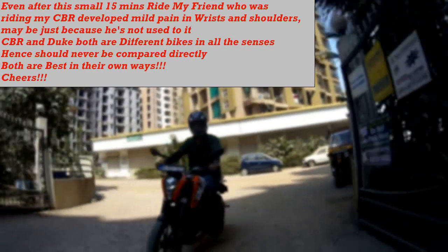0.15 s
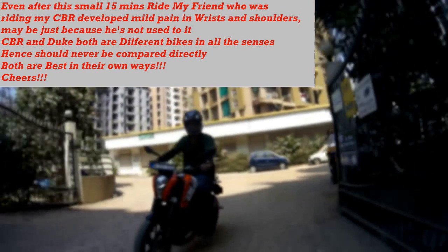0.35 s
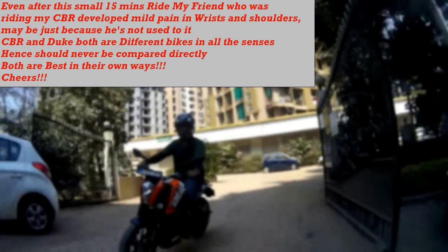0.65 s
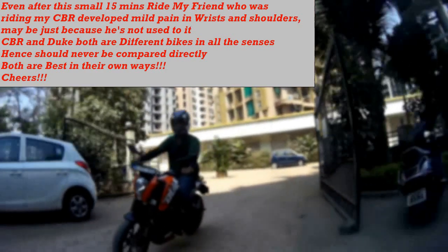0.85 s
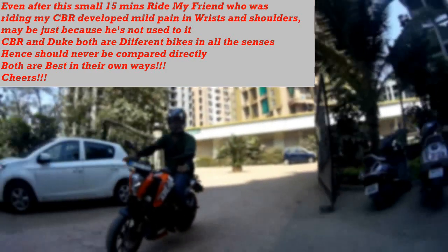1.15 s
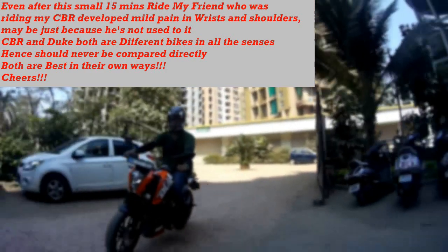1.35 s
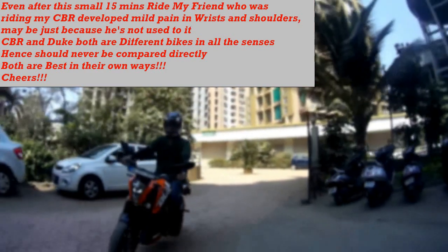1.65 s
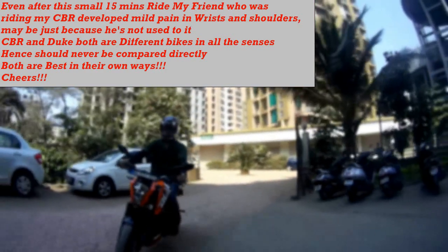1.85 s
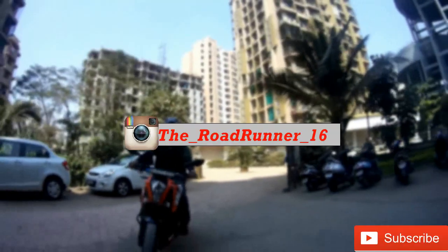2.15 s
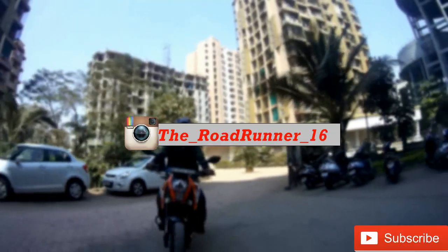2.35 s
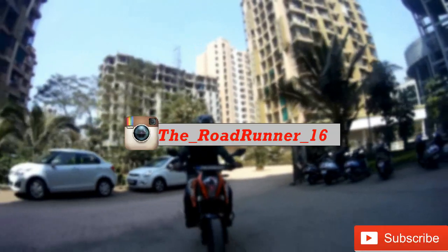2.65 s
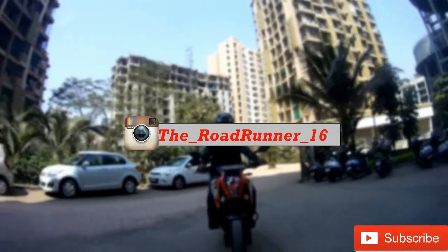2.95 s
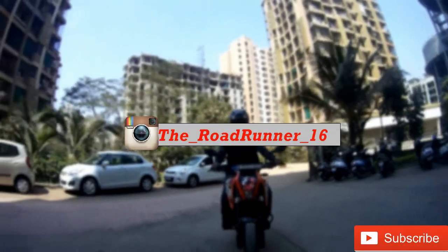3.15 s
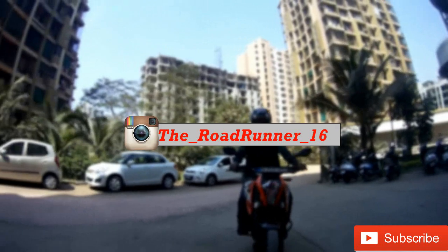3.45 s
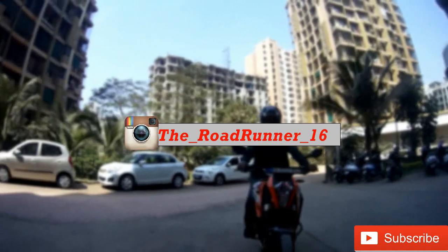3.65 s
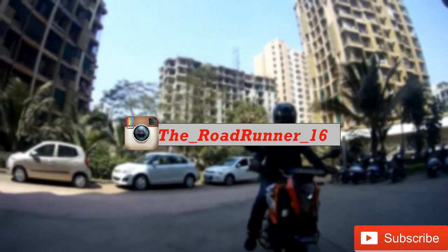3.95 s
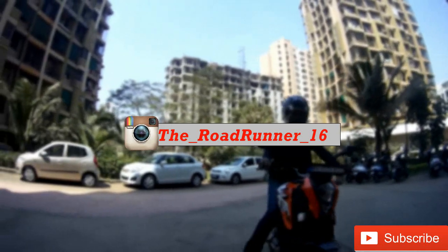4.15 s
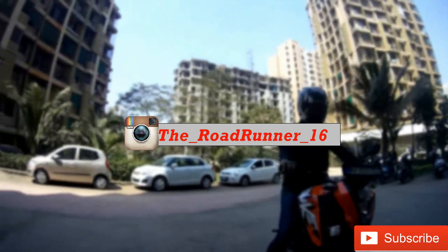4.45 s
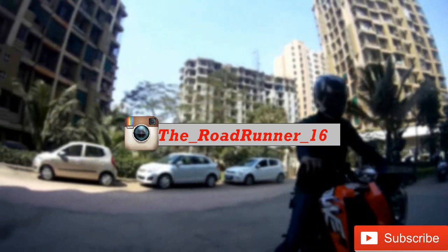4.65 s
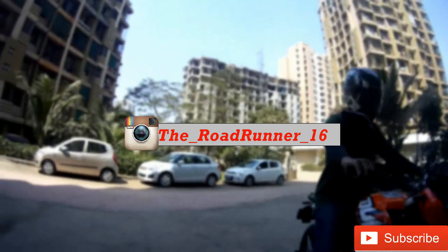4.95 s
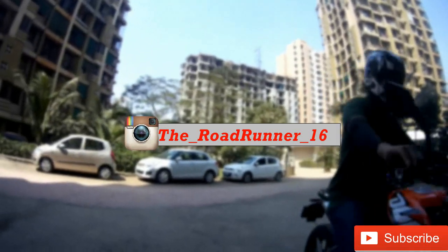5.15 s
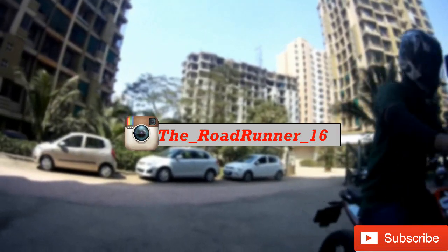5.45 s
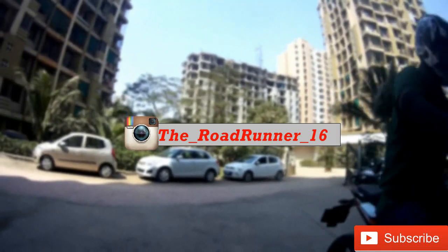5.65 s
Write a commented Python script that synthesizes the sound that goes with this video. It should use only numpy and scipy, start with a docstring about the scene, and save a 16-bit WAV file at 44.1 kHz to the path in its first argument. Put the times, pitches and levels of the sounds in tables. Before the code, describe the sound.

In a quiet lane, a motorcycle approaches with a gentle, throaty pull of its single-cylinder engine. The revs soon fall, a few faint ticks come from the chassis, and the engine settles into a steady putter close by, with valves clattering in step with the exhaust beats. The moving microphone picks up a low rumble that fades about halfway through, while the idle carries on to the end.

```python
"""Motorcycle pulling up in a lane

A single-cylinder four-stroke rolls up on a little throttle, shuts off and idles a few steps from the
microphone. Each firing sends a puff through the silencer and a sharp bark that bounces about the lane;
valve gear and casings clatter in step. The chassis ticks now and then, and a low rumble shakes the
microphone while it is on the move."""
import sys
import numpy as np
from scipy import signal
from scipy.io import wavfile
from scipy.ndimage import uniform_filter1d

SR = 44100
rng = np.random.default_rng(int(sys.argv[2]) if len(sys.argv) > 2 else 0)


def transcribe(u):
    """Save the signal u as a 16-bit wav file named by the first command-line argument.

    u: samples, shape (n,) or (channels, n), limited to [-1, 1]; the rate is SR.
    q: integer samples, one column per channel.
    """
    v = np.clip(np.atleast_2d(u).T, -1, 1)
    q = np.round(v * 32767).astype(np.int16)
    wavfile.write(sys.argv[1], SR, q)


N = 255339
TIME = np.arange(N) / SR
RUN_IN = SR // 4   # samples: the engine is already turning at time zero

# air of the lane, the bass band first: (frequency [Hz], width [Hz], relative level [dB])
AIR_BANDS = [(47, 23, 40), (1500, 4300, 8), (4360, 3000, 2), (8250, 4500, 2), (12500, 4600, 1.5)]
# shaking of the microphone: (frequency [Hz], width [Hz], relative level [dB])
SHAKE_BANDS = [(31.8, 44, 1.0), (53.0, 6.6, -4.0), (115.5, 80, 1.7)]
# swells of the microphone rumble: (time [s], length [s], lift [dB])
RUMBLE_SWELLS = [(0.597, 0.39, 4), (1.166, 0.34, 10.5), (1.787, .5, 7), (2.7, 0.36, 5.0),
                 (3.277, 0.28, 1.5)]
# ticks of loose chassis parts: (time [s], level [dB], frequency [Hz])
CHASSIS_TICKS = [(1.109, -58, 4700), (1.189, -61, 4070), (1.359, -60.5, 4300), (1.552, -55, 4600),
                 (1.882, -41.5, 2370), (1.883, -67, 5500)]
# a gentle pull, the run-down, then an idle that stumbles once or twice: (time [s], firing rate [Hz])
FIRING_RATE = [(0.0, 26.057), (0.71, 28.719), (0.96, 24.458), (1.34, 15.835), (1.4, 13.179), (1.65, 12.033),
               (2.8, 11.557), (3.12, 11.351), (3.25, 12.223), (3.59, 11.002), (3.74, 12.034),
               (3.93, 11.581), (4.84, 11.455), (5.1, 11.718), (5.79, 11.586)]
# the rider's throttle: (time [s], opening [0-1])
THROTTLE_OPENING = [(0, .75), (.3, .95), (.6, 1.0), (.78, .8), (.95, .45), (1.15, .2), (1.5, .04),
                    (2.2, 0.0), (5.79, 0.0)]
# blows of metal on metal: (place in cycle [0-1], decay [cycles], in the case [dB], in the covers [dB])
ENGINE_CONTACTS = [(.925, 0.042, 9.5, 11), (0.2, 0.07, -1.5, 4), (0.2, 0.041, 3, -7), (.42, 0.036, 8, 6.5),
                   (0.5, 0.2, -3, -8.5)]
# frame and crankcase resonances: (frequency [Hz], width [Hz], relative level [dB])
CASE_MODES = [(109, 50, -7), (132.2, 21, -13), (212.2, 53.6, -2), (240.5, 26, 3), (304.1, 41, -2.5),
              (410.6, 33.6, 5), (474.9, 42, 2.5), (532.4, 42.7, -2)]
# cylinder head and cover resonances: (frequency [Hz], width [Hz], relative level [dB])
COVER_MODES = [(627, 57, -2), (713.4, 51, -0.5), (824.5, 120, -5.5), (959, 82, -3.5), (1057.3, 120, 2),
               (1286.7, 137, 1), (1589, 120, -13.5), (1827, 220, -19), (2002, 111, -13.5), (2225, 160, -16),
               (2512, 310, -29), (2895, 110, -29.5), (3300, 360, -45.5), (4363, 100, -41)]
# resonances of the valve clack: (frequency [Hz], width [Hz], relative level [dB])
CLACK_MODES = [(1675, 100, -10), (2003, 360, 2.5), (2860, 200, -19.5), (4540, 1800, -29.5)]
# piston knocks under load, one at each end of every stroke: (place in cycle [0-1], level at throttle 1 [dB])
STROKE_KNOCKS = [(0.041, -58.5), (0.281, -63.5), (.55, -55), (0.774, -55.5)]
# hiss of gas leaving the pipe: (frequency [Hz], width [Hz], relative level [dB])
JET_BANDS = [(1776, 820, 21), (2878, 82, 10.5), (3660, 1200, -2.5), (4330, 330, 0.5), (4930, 1000, -5.5),
             (7000, 2300, -14), (10400, 6500, -20.5)]
# silencer resonances with the throttle shut: (frequency [Hz], width [Hz], relative level [dB])
SILENCER_MODES = [(97.2, 6.9, 2), (124, 15, -18), (140, 15, -11.5), (220, 19, -16), (228.2, 8, -9.5),
                  (246.6, 14.6, 5), (299.3, 8.3, -19)]
# pipe resonances that boom under load: (frequency [Hz], width [Hz], relative level [dB])
BOOM_MODES = [(108.7, 27.7, 1.5), (191.6, 25, -0.5), (217.4, 9.5, 1), (241, 15, 4), (295, 24, -10),
              (399.2, 18, -4), (491.8, 22, -2.5), (715.6, 36, -5.5)]
# resonances of the bark: (frequency [Hz], width [Hz], relative level [dB])
BARK_MODES = [(422.6, 47, 14), (460, 73, -6.5), (990, 71, -5.5)]
# the bark returning from pipe ends, ground and parked cars: (delay [s], gain [signed ratio])
BARK_ECHOES = [(.0138, -.5), (.0225, -.3), (.0385, -.25)]
# exhaust at the microphone as the bike rolls up and turns: (time [s], thump trim [dB], bark trim [dB])
MIC_EXPOSURE = [(.15, 0.4, -2.5), (.6, 0, 1.5), (1.5, 0, 1.1), (2.15, -1, 2), (3.3, 0, 0.46),
                (4.8, -1.1, -0.65), (5.75, 0, 1.2)]


def from_db(db):
    """Decibels to gain."""
    return 10 ** (np.asarray(db) / 20)


def rms_one(x):
    """Scale to unit rms."""
    return x / np.sqrt(np.mean(x ** 2) + 1e-20)


def in_time(rows):
    """Each column of a curve at every sample."""
    times, *columns = np.transpose(rows)
    return [np.interp(TIME, times, column) for column in columns]


def cut(x, hz, kind, order=2):
    """Butterworth filter."""
    edges_hz = np.clip(hz, 10, .45 * SR)
    return signal.sosfilt(signal.butter(order, edges_hz, kind, fs=SR, output="sos"), x + 1e-18)


def clicks(times, sizes):
    """Single-sample impulses on a track that includes the run-in."""
    out, at = np.zeros(RUN_IN + N), RUN_IN + np.round(times * SR).astype(int)
    inside = (at >= 0) & (at < len(out))
    out[at[inside]] = sizes[inside]
    return out


def resonate(x, modes):
    """Parallel two-pole resonances, each with its own peak gain."""
    out = 0
    for hz, width, db in modes:
        radius = np.exp(-np.pi * width / SR)
        feedback = [1, -2 * radius * np.cos(2 * np.pi * hz / SR), radius ** 2]
        out += from_db(db) * (1 - radius ** 2) / 2 * signal.lfilter([1, 0, -1], feedback, x + 1e-18)
    return out


def rattle(drive, modes, grain_db):
    """Dense tiny impacts of uneven size, as strong as the drive, ring steep-sided resonances; rms 1."""
    sizes = np.repeat(np.clip(rng.standard_normal(N // 32 + 1), -2, 2), 32)[:N]
    grains = rng.standard_normal((3, N)) * from_db(grain_db * sizes)
    out = 0
    for k, (hz, width, db) in enumerate(modes):
        band = [hz - width / 2, hz + width / 2]
        out += from_db(db) * cut(drive * grains[k % 3], band, "band", order=3)
    return rms_one(out)


def evened(pulses, cycle):
    """Drop the run-in and scale a pulse train to unit rms over every three engine cycles."""
    pulses, whole = pulses[RUN_IN:], cycle.astype(int)
    energy = uniform_filter1d(np.bincount(whole, pulses ** 2), size=3)
    samples = uniform_filter1d(np.bincount(whole).astype(float), size=3)
    power = np.interp(cycle, np.arange(len(energy)) + .5, energy / samples)
    return pulses / np.sqrt(power + 1e-20)


def blow(cycle, place, decay):
    """Envelope of a blow that lands at one place in every cycle and dies away."""
    return np.exp(-((cycle - place) % 1) / decay)


def lane_air():
    """The lane's own background: a faint bass murmur under an even hiss."""
    murmur = from_db(-54) * rattle(1, AIR_BANDS[:1], grain_db=9.5)
    return murmur + from_db(-69.5) * rattle(1, AIR_BANDS[1:], grain_db=1)


def microphone_rumble(stop_s=3.2, settle_s=.45, throb_hz=27.3):
    """The moving microphone shakes with a wavering throb, which sinks as it comes to rest."""
    level_db = np.interp(TIME, [stop_s, stop_s + settle_s], [-42.5, -51])
    for at, length, lift_db in RUMBLE_SWELLS:
        level_db += lift_db * np.exp(-(2 * (TIME - at) / length) ** 4)
    waver_hz = np.interp(TIME, np.linspace(0, N / SR, 30), rng.standard_normal(30))
    throb = np.sqrt(2) * np.sin(2 * np.pi * np.cumsum(throb_hz + waver_hz) / SR)
    shake = rattle(1, SHAKE_BANDS, grain_db=-4)
    return from_db(level_db - 1) * throb + from_db(level_db + 5) * shake


def chassis_ticks(decay_s=.0037):
    """Small loose parts of the chassis click and ring briefly."""
    out = 0
    for at, db, hz in CHASSIS_TICKS:
        ring = rms_one(cut(rng.standard_normal(N), [.86 * hz, 1.14 * hz], "band"))
        out += from_db(db) * ring * (TIME >= at) * np.exp(-np.abs(TIME - at) / decay_s)
    return out


def stroke_knocks(cycle, throttle, decay_cycles=.023, uneven_db=3.5):
    """Under load the piston knocks brightly at each end of its stroke, four times a cycle, fading as the
    throttle eases."""
    blows = 0
    for place, db in STROKE_KNOCKS:
        which = np.floor(cycle - place).astype(int) + 2
        strength = from_db(db + uneven_db * np.clip(rng.standard_normal(which[-1] + 1), -2, 2))
        blows += strength[which] * blow(cycle, place, decay_cycles)
    return blows * throttle ** 2.5 * rms_one(cut(rng.standard_normal(N), [3800, 11500], "band"))


def valve_clack(cycle, clatter_db):
    """The exhaust valve gear gives a crisp clack just ahead of each bark."""
    strike = blow(cycle, place=.94, decay=.029)
    return from_db(clatter_db - 24) * rattle(strike, CLACK_MODES, grain_db=4)


def casing_clatter(cycle, throttle, bark_db, clatter_db, uneven_db=.9):
    """Piston, valves and cam chain strike at fixed places in the cycle and ring the case and covers."""
    case_power, cover_power = 1, 1   # the steady whirr of gears
    for place, decay, case_db, cover_db in ENGINE_CONTACTS:
        which = np.floor(cycle - place).astype(int) + 2
        strength = from_db(uneven_db * rng.standard_normal(which[-1] + 1))   # no two blows are alike
        strike = strength[which] * blow(cycle, place, decay)
        case_power += strike * from_db(case_db) ** 2
        cover_power += strike * from_db(cover_db) ** 2
    case = rattle(np.sqrt(case_power), CASE_MODES, grain_db=2)
    covers = rattle(np.sqrt(cover_power), COVER_MODES, grain_db=2)
    return from_db(bark_db + 1 - 3 * throttle) * case + from_db(clatter_db + 1 - .47 * throttle) * covers


def gas_jet(cycle, throttle):
    """With the throttle open, gas hisses from the pipe, pulsing slightly with each firing."""
    flow = 1 + .099 * np.cos(2 * np.pi * cycle)
    return from_db(-43.5) * throttle ** .65 * rattle(flow, JET_BANDS, grain_db=4)


def firing_times(cycle, count=5):
    """Moments at which the cycle count is whole, with a few earlier ones at the opening speed."""
    earlier = (np.arange(-count, 1) - cycle[0]) / (cycle[1] - cycle[0])
    later = np.interp(np.arange(1, int(cycle[-1]) + 1), cycle, np.arange(N))
    return np.r_[earlier, later] / SR


def pipe_boom(puff):
    """The puff passes two chambers in turn, so each resonance swells and blends into the next firing."""
    return sum(resonate(resonate(puff, [(hz, width, 0)]), [(hz, width, db)])
               for hz, width, db in BOOM_MODES)


def exhaust_bark(fired, sizes):
    """Each firing cracks from the pipe and comes back off pipe ends, ground and parked cars."""
    direct = clicks(fired - .0008, sizes)
    echoes = sum(gain * clicks(fired + delay, sizes) for delay, gain in BARK_ECHOES)
    crack = cut(-direct - echoes, 620, "low", order=4)
    return resonate(cut(crack, 200, "high"), BARK_MODES)


def exhaust(cycle, throttle, thump_db, bark_db, uneven_db=1.0, jitter_s=.0003, valve_lead_s=.0068):
    """The valve opens with a deep puff; a sharp bark follows a few milliseconds later."""
    fired = firing_times(cycle)
    puff_spread, bark_spread, time_spread = rng.standard_normal((len(fired), 3)).T
    load = .6 * throttle
    idling = 1 - np.interp(fired, TIME, load)
    fired += jitter_s * idling * time_spread   # unloaded combustion is less regular
    openings = clicks(fired - valve_lead_s, from_db(uneven_db * idling * puff_spread))
    puff = cut(cut(openings, 451, "low", order=4), 85, "high")
    thump = from_db(thump_db - 1.1) * np.sqrt(1 - load) * evened(resonate(puff, SILENCER_MODES), cycle)
    boom = from_db(thump_db + 2.55) * np.sqrt(load) * evened(pipe_boom(puff), cycle)
    bark = evened(exhaust_bark(fired, from_db(uneven_db * bark_spread)), cycle)
    return thump + boom + from_db(bark_db - 5.5) * bark


def side_on(pipe, turn_s=(3.4, 5.6), note_hz=255, width_hz=23, lift_db=4.5):
    """As the bike turns side on to the microphone, the silencer comes clear and its main note grows."""
    turned = np.interp(TIME, turn_s, [0, 1])
    return pipe + (from_db(lift_db * turned) - 1) * resonate(pipe, [(note_hz, width_hz, 0)])


def scene():
    """The bike on one microphone: one crank drives every engine part, the throttle sets how loud."""
    firing_hz, = in_time(FIRING_RATE)
    throttle, = in_time(THROTTLE_OPENING)
    thump_trim_db, bark_trim_db = in_time(MIC_EXPOSURE)
    thump_db = -31.5 + 17 * throttle ** .59 + thump_trim_db   # the first touch of throttle adds most
    bark_db = -31 + 10.5 * throttle ** .53 + bark_trim_db
    clatter_db = -38.5 + 5.2 * throttle ** .6
    cycle = .0266 + np.cumsum(firing_hz) / SR   # a firing at every whole number
    pipe = side_on(exhaust(cycle, throttle, thump_db, bark_db)) + gas_jet(cycle, throttle)
    casings = casing_clatter(cycle, throttle, bark_db, clatter_db)
    valves = valve_clack(cycle, clatter_db) + stroke_knocks(cycle, throttle)
    return (pipe + casings + valves + chassis_ticks() + microphone_rumble() + lane_air())[None]


def record(dry, low_cut_hz=20, high_cut_hz=15400):
    """The deepest bass is lost and the top is cut steeply."""
    return cut(cut(dry, low_cut_hz, "high", order=3), high_cut_hz, "low", order=14)


dry = scene()
out = record(dry)
transcribe(out)
```